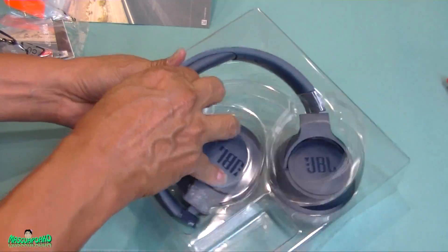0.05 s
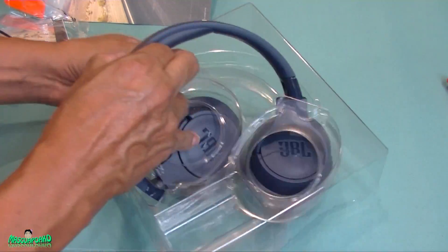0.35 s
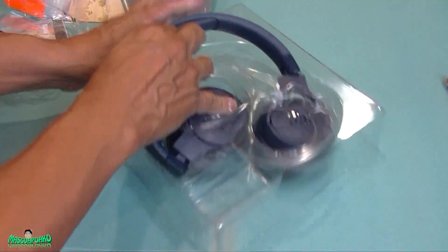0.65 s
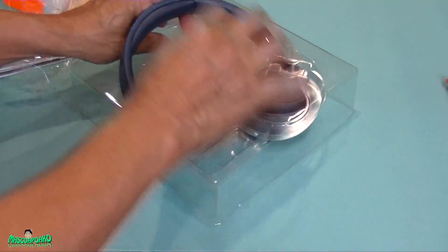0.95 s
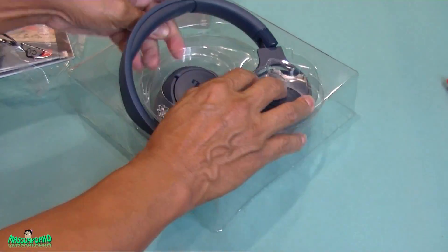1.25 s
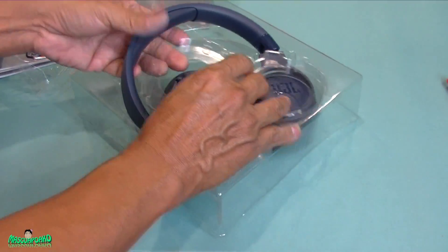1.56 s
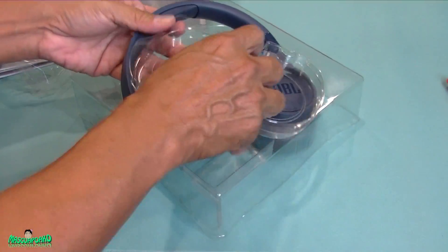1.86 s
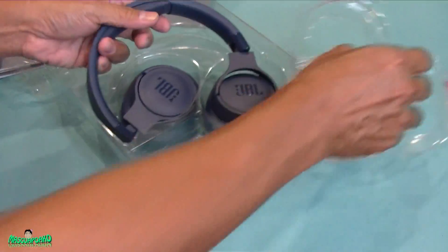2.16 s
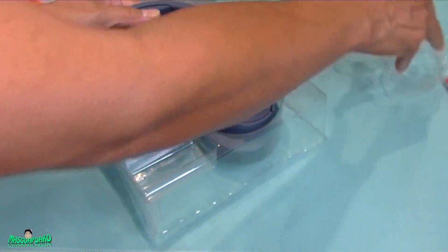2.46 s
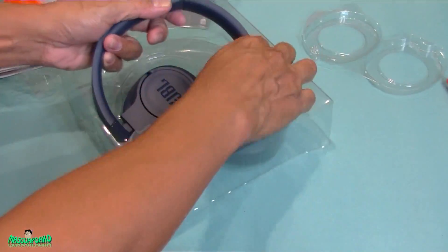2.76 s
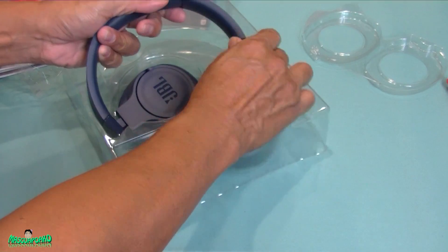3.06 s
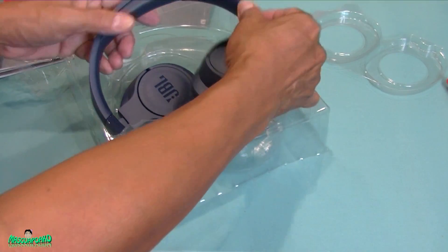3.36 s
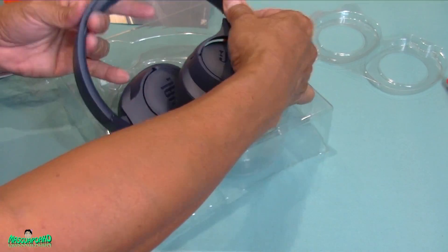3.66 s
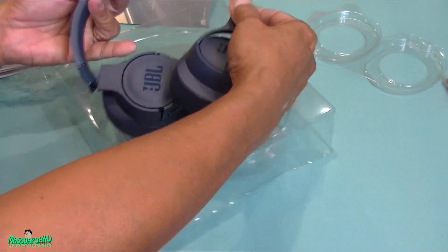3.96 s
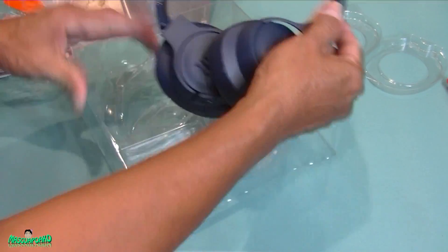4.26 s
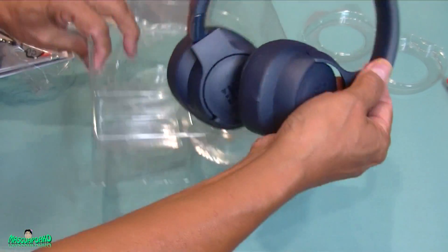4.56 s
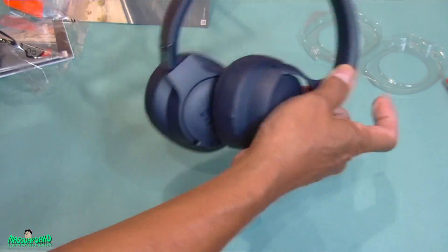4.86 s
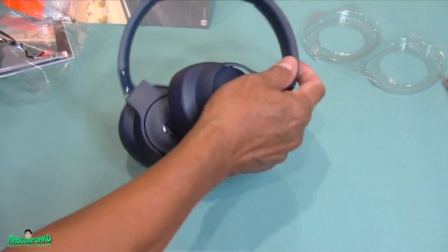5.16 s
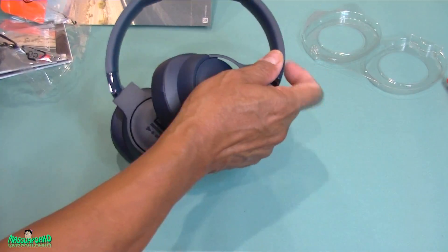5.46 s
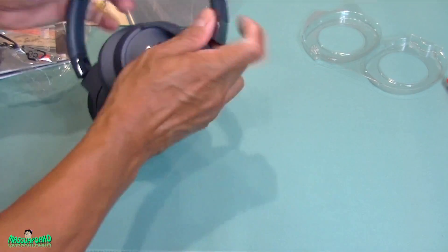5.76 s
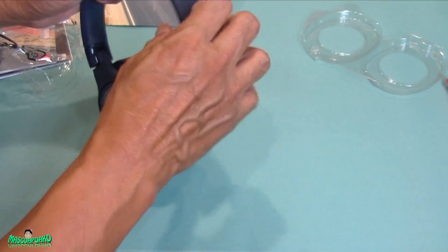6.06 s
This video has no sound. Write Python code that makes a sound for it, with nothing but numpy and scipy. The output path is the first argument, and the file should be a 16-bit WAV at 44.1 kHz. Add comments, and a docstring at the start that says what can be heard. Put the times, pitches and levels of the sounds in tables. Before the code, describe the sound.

A stiff plastic tray crackles, snaps and scrapes as hands pull out headphones, which then click and knock on a table.

```python
"""Hands pull headphones out of a stiff plastic tray on a table, close by in a small room.
First the thin walls buckle loudly and scrape, while the hands' pressure drives stick-slip rubbing and
small snaps. At 1.8 s a round cover pops off. Snaps and scrapes go on, with soft knocks on the table.
From 4.8 s the freed headphones click at their hinges, and at 5.2 s they knock down hardest.
The last clicks and fingertip strokes die away over room air and a faint low hum."""
import sys
import numpy as np
from scipy import signal
from scipy.fft import rfft, irfft
from scipy.io import wavfile

SR = 44100
rng = np.random.default_rng(int(sys.argv[2]) if len(sys.argv) > 2 else 0)


def put_to_file(sound):
    """Save the sound as 16-bit audio at rate SR, in the file named by the first command-line argument."""
    columns = np.atleast_2d(sound).T  # one column per channel
    safe = np.clip(columns, -1, 1)
    whole_steps = np.round(safe * 32767)
    wavfile.write(sys.argv[1], SR, whole_steps.astype(np.int16))


N = 274169
TIME = np.arange(N) / SR

# loudest snaps of the tray: t/s, panel level/dB, panel f/Hz, crack level/dB, crack f/Hz
TRAY_SNAPS = [(.0685, 3, 1700, 6, 8350), (.0804, 5, 1970, 1.5, 8050), (0.0893, 5.5, 910, 6, 7200),
              (0.0952, -3.5, 530, 5.5, 8300), (.116, -5, 480, -0.5, 8300), (.1581, -18, 1110, -2.5, 7360),
              (0.185, -6.5, 580, -2, 8500), (.27, 8, 1450, 1, 5740), (0.322, -9, 1750, -13, 4360),
              (.3631, 3, 2110, -5, 8050), (.367, 2.5, 1320, -3, 7300), (0.3825, 9, 1700, -3, 4740),
              (.458, -9, 2170, -8, 4000), (0.5116, -3.5, 700, -14, 8300), (.572, -7, 1530, -6.5, 7300),
              (0.595, -0.5, 1120, -14, 4050), (.8675, -1.5, 730, -8, 7500), (0.88, 5, 1730, 3, 7250),
              (0.8853, 1, 1580, -2, 6860), (.9537, 0, 1440, -6, 6260), (.981, -7.5, 1920, -8.5, 6900),
              (1.037, -4.5, 1450, -2.5, 7650), (1.1926, -3, 576, -19, 5270), (1.3432, -2.5, 660, -13, 4000),
              (1.353, 0, 2360, 8.5, 7800), (1.513, -8, 846, -15, 3350), (1.6265, -6, 1310, -8.5, 4140),
              (1.6434, -8.5, 1840, -9, 6440), (1.8728, -15, 1880, -4.5, 8360),
              (2.4069, -10, 1260, -14.5, 5200), (2.5638, -7.5, 1770, -5, 4140),
              (2.5782, -10, 1360, -10, 4150), (2.702, -6, 1250, -18, 6300), (2.83, -10, 1570, -4, 5750),
              (2.8684, 3.5, 1640, -1, 4800), (2.9842, -9.5, 1600, -6, 7300), (3.563, -4, 2330, -6.5, 5030),
              (3.605, -2, 1200, -5.5, 5000), (3.7258, -4.5, 940, -4.5, 5130),
              (3.7464, -1.5, 1320, -22, 3990), (3.8044, -1, 860, -16, 4270), (3.9905, -2.5, 660, -22, 8130),
              (4.15, -19.5, 2510, -11.5, 6660), (4.2399, -13, 1280, -22.5, 8100),
              (4.4023, -4, 1230, -12, 6400), (4.4788, -4.5, 784, -8.5, 4800), (4.485, -1, 1440, -5, 4340),
              (4.617, -19, 1580, -15, 9250)]
# main resonances of the tray: f/Hz, bandwidth/Hz, gain/dB
TRAY_MODES = [(484, 66, 10), (634, 124, 8.5), (1070, 55, -2), (1220, 180, 2), (1410, 240, -2.5)]
# the hands' pressure, as the level of steady rubbing: t/s, level/dB
HAND_PRESSURE = [(0, -33), (.25, -43.5), (1.0, -36.5), (1.26, -48.5), (1.42, -43.5), (1.7, -53),
                 (2.16, -40.5), (2.38, -50), (2.76, -43), (3.08, -50.5), (3.46, -51.5), (3.84, -41),
                 (4.12, -56.5), (4.57, -45.5), (4.72, -62), (5.35, -61.5), (5.65, -69), (6.2, -65)]
# scrapes that build up and let go: peak t/s, wall level/dB, surface level/dB, rise/s, fall/s
WALL_SCRAPES = [(0.096, -20, -26.5, 0.026, 0.04), (.18, -49, -37.5, 0.026, 0.05),
                (.598, -27.5, -32.5, 0.014, 0.013), (.634, -22, -30, .01, 0.01),
                (.73, -30, -36, 0.021, .02), (.824, -15, -27.5, 0.059, .028),
                (1.127, -20.5, -22.5, 0.0059, 0.0027), (1.211, -30, -43, .006, 0.015),
                (1.3, -37, -47, .004, 0.013), (1.63, -32, -40, 0.013, .016), (1.875, -40, -41, .012, .02),
                (2.02, -33, -43, 0.029, 0.046), (2.214, -35, -41, .035, 0.048),
                (2.33, -31.5, -39, .03, 0.021), (2.445, -37, -40, .003, .012),
                (2.717, -30.5, -47, 0.01, 0.019), (2.849, -23.5, -30, 0.013, 0.012),
                (2.99, -25, -32, 0.0044, 0.011), (3.55, -35.5, -45.5, 0.027, .02),
                (3.598, -29, -43, 0.013, 0.024), (3.748, -33, -46, 0.008, 0.015),
                (3.829, -29.5, -40, 0.021, 0.0059), (3.93, -35, -50, 0.026, 0.022),
                (4.002, -31.5, -43.5, 0.0046, 0.036), (4.29, -42, -53, 0.021, 0.016),
                (4.422, -22.5, -31.5, 0.0078, 0.026), (5.15, -44, -49, 0.034, 0.016),
                (5.24, -36, -44, 0.048, 0.022), (5.885, -55, -47, .004, .01)]
# spectrum of the rubbed walls: f/Hz, level/dB
WALL_SPECTRUM = [(88, -46), (150, -11.5), (296, -5), (391, -5), (428, -15), (485, -6), (913, 2),
                 (1100, 3.5), (1500, -1.5), (1750, -0.5), (2340, -1.5), (3290, -16), (4270, -6),
                 (4990, -20), (6000, -53), (7800, -71), (13200, -120)]
# spectrum of the surface crackle: f/Hz, level/dB
CRACKLE_SPECTRUM = [(1470, -26.5), (2500, -2.5), (3230, -2), (4080, 0), (4730, -3.5), (8200, -2.5),
                    (14200, -8.5), (14900, -5), (16000, -36)]
# resonances of the whole shell under a hard drag: f/Hz, bandwidth/Hz, gain/dB
SHELL_MODES = [(502, 69, 6.5), (1150, 290, -0.5), (1420, 200, -8)]
# modes of the round cover over an ear cup: f/Hz, level/dB, T60/s
COVER_MODES = [(1350, 0.5, 0.012), (2180, -12.5, 0.0029), (3550, -16, 0.0059), (4300, -8, 0.0064),
               (8270, -18, .004)]
# soft blows of the headphones on table and tray: t/s, level/dB, cut-off f/Hz, chatter duration/s
BLOWS = [(0.0897, -1, 900, .003), (.53, -10.5, 450, .003), (.645, -8.5, 500, .003), (2.46, -9.5, 493, .003),
         (2.562, -10, 480, .021), (3.806, -7, 805, .015), (4.401, -8.5, 800, .003),
         (4.449, -2.5, 900, .003), (5.2198, 3, 1850, .033)]
# modes of the table top: f/Hz, level/dB, T60/s
TABLE_MODES = [(264, -17, 0.076), (408, 2, .1), (519, 5.5, 0.059), (587, 20, 0.083), (770, -12, 0.082),
               (813, 8.5, .08), (1119, 22, 0.041), (1310, 2, 0.055), (1700, 0, 0.06)]
# clicks of the headphones' hinges and casing: t/s, body level/dB, body f/Hz, crack level/dB
HINGE_CLICKS = [(4.777, -20, 890, -35), (4.892, -22, 840, -40), (4.956, -21, 960, -35),
                (5.121, -11.5, 1560, -10), (5.19, -8, 1740, -15), (5.2173, -5.5, 1520, -16.5),
                (5.271, -28, 1500, -21), (5.41, -24, 1500, -35), (5.707, -25, 1380, -42),
                (5.7792, -13.5, 1550, 7), (5.8164, -9, 1500, -11.5), (6.07, -24.5, 1560, -15.5)]
# squeaks of plastic on plastic: t/s, first f/Hz, last f/Hz, level/dB, duration/s, overtone gain/dB
PLASTIC_SQUEAKS = [(0.354, 2300, 2350, -30, 0.015, -16), (1.867, 2030, 1940, -40, 0.017, -20),
                   (3.694, 4280, 4400, -40.5, 0.02, 8), (3.704, 4800, 5000, -43.5, 0.022, 2),
                   (5.152, 2010, 2060, -48, 0.048, -22)]
# fingertips brushing smooth plastic: middle t/s, level/dB, half duration/s
FINGER_STROKES = [(1.932, -44, .012), (2.75, -49, 0.019), (3.187, -51.5, 0.028), (3.363, -52, 0.054),
                  (5.445, -63, 0.15), (5.966, -60, 0.053), (6.138, -54.5, 0.029)]
# reverberation of the room: f/Hz, T60/s, level/dB
ROOM_DECAY = [(202, 0.39, 0.5), (554, 0.29, -4), (1400, 0.3, -6.5), (3600, 0.31, -5), (9200, 0.25, -7.5),
              (15000, 0.27, -7.5)]
# spectrum of the room air: f/Hz, level/dB
AIR_SPECTRUM = [(12, -34), (20, -14), (63, -4), (182, -17), (347, -14), (542, -21), (624, -18),
                (678, -20.5), (1960, -29.5), (2390, -33), (10500, -38.5), (13500, -39), (16000, -35)]
# frequency response of the microphone: f/Hz, gain/dB
MIC_RESPONSE = [(100, 2), (900, 0.5), (1300, -3), (3000, 3.5), (5000, -0.5), (8500, 2.5), (10500, 0.5),
                (13000, 1.5), (15500, -6)]


def tray_snaps(tray_db=-10, ring_at_0db_s=.023, halving_db=18.5, slackest_s=.035):
    """Damped resonance: a harder snap comes from a tauter panel and dies sooner; the tray rings along."""
    events = []
    for s, panel_db, panel_hz, crack_db, crack_hz in TRAY_SNAPS + small_snaps():
        ring_s = min(ring_at_0db_s * 2 ** (-max(panel_db, crack_db) / halving_db), slackest_s)
        events.append((s, panel_db, panel_hz, crack_db, crack_hz, ring_s))
    direct = buckling(events)
    return direct + undb(tray_db) * resonate(direct, TRAY_MODES)


def small_snaps(per_s=13, above_pressure_db=26, spread_db=2.5, spread_octaves=.42):
    """Elastic instability: the sheet gives way at random times, louder the harder it is pressed."""
    count = int(per_s * N / SR)
    times = rng.uniform(0, TIME[-1], 256)[:count]
    scatter = np.clip(rng.standard_normal((256, 4))[:count].T, -2, 2)
    panel_db, crack_db = pressure_db(times) + above_pressure_db + spread_db * scatter[:2]
    panel_hz, crack_hz = [[1070], [5800]] * 2 ** (spread_octaves * scatter[2:])
    return list(zip(times, panel_db, panel_hz, crack_db - 3.5, crack_hz))


def buckling(events, rise_s=.0003, flutter_db=-1, tail_db=-14, zing_db=-7):
    """Snap-through buckling: a panel flips and rings, waves flutter through it, and the crease cracks."""
    out, t = np.zeros((2, N)), np.arange(4096) / SR
    onset = 1 - np.exp(-t / rise_s)  # the buckle takes a moment to cross the panel
    for s, panel_db, panel_hz, crack_db, crack_hz, ring_s in events:
        slack = ring_s / .011  # a taut panel pops with a clear pitch, a slack one rattles
        flip = unit_energy(np.sin(2 * np.pi * panel_hz * t) * onset * decay(t, .28 * ring_s))
        waves = stereo_noise(len(t), .1) * onset * decay(t, 1.36 * ring_s)
        flutter = unit_energy(band(waves, panel_hz, .69 * panel_hz))
        panel = flip + undb(flutter_db) * slack * flutter
        panel = unit_energy(cut(cut(panel, 380, "high"), 2500, "low"))
        crack_envelope = onset * (decay(t, .22 * ring_s) + undb(tail_db) * slack * decay(t, ring_s))
        crack = cut(stereo_noise(len(t), .42) * crack_envelope, 1630, "high")
        crack = unit_energy(band(crack, crack_hz, .97 * crack_hz))
        zing = unit_energy(np.sin(2 * np.pi * crack_hz * t) * onset * decay(t, .0018))
        crease = unit_energy(crack + undb(zing_db) * zing / slack)
        add(out, s - rise_s, undb(panel_db) * panel + undb(crack_db) * crease)
    return out


def rubbing(surface_db=-8, firm_db=-42, hard_drag_db=-19, unsteady_db=2):
    """Stick-slip friction drives the walls into a hollow rasp, while the surface fizzes and ticks."""
    wall = undb(pressure_db(TIME) + unsteady_db * drift(14))
    surface = undb(surface_db) * wall
    catching = np.minimum(surface / undb(firm_db), 1)  # a light touch glides, a firm one catches
    sparse_slips = slips(per_s=80, spread_db=2.6, side=.4, t60=.005)
    ticks = undb(-.5) * surface * catching * unit_rms(colour(sparse_slips, CRACKLE_SPECTRUM))
    for peak_s, hollow_db, bright_db, rise_s, fall_s in WALL_SCRAPES:
        swell = np.exp(-np.abs(TIME - peak_s) / np.where(TIME < peak_s, rise_s, fall_s))
        wall = np.hypot(wall, undb(hollow_db) * swell)
        surface = np.hypot(surface, undb(bright_db) * swell)
    force = colour(slips(per_s=1400, spread_db=1.96, side=.16, t60=.014), WALL_SPECTRUM)
    rasp = unit_rms(force + undb(2) * resonate(force, TRAY_MODES))
    shell = unit_rms(resonate(force, SHELL_MODES))
    drag = np.minimum(wall / undb(hard_drag_db), 1)  # in a hard drag the shell's resonances take over
    fizz = unit_rms(colour(slips(per_s=980, spread_db=2.8, side=.31, t60=.034), CRACKLE_SPECTRUM))
    return wall * ((1 - drag) * rasp + drag * shell) + surface * fizz + ticks


def slips(per_s, spread_db, side, t60):
    """Shot noise: tiny stick-slip releases of very uneven size, each smeared briefly by the sheet."""
    sizes = undb(spread_db * np.minimum(rng.exponential(size=N), 4.5))
    releases = sizes * (rng.random(N) < per_s / SR)
    energy = signal.lfilter([1], [1, -decay(2 / SR, t60)], releases ** 2)
    return unit_rms(stereo_noise(N, side) * np.sqrt(energy))


def pressure_db(times):
    """Friction grows with load: the hands' pressure as a rubbing level at the given times."""
    return np.interp(times, *np.transpose(HAND_PRESSURE))


def cover_pop(at_s=1.7682, level_db=9.2, rise_s=.00064, rim_db=-4):
    """Snap-through of a dome: the taut cover flips once with a hollow pop, and its rim crackles."""
    out, t = np.zeros((2, N)), np.arange(2048) / SR
    onset = 1 - np.exp(-t / rise_s)
    dome = 0
    for hz, db, t60 in COVER_MODES:
        mode = np.sin(2 * np.pi * (hz * t + rng.random()))
        dome += undb(db) * unit_energy(mode * onset * decay(t, t60))
    rim = unit_energy(band(stereo_noise(len(t), .85) * onset * decay(t, .01), 2200, 4200))
    add(out, at_s, undb(level_db) * (dome + undb(rim_db) * rim))
    return out


def knocks(thud_db=2, thud_t60=.034):
    """Impact excitation: padded blows thud and ring the table's modes; softer contact sounds duller."""
    out, t = np.zeros((2, N)), np.arange(SR // 4) / SR
    for s, db, cutoff_hz in contacts():
        weights = 1 + .5 * rng.standard_normal(len(TABLE_MODES))  # each spot favours other modes
        ring = sum(weight * undb(mode_db) * np.sin(2 * np.pi * hz * t) * decay(t, t60)
                   for weight, (hz, mode_db, t60) in zip(weights, TABLE_MODES))
        thud = stereo_noise(len(t), .36) * decay(t, thud_t60)
        thud = cut(cut(thud, 275, "high"), 1380, "low")
        blow = unit_energy(ring) + undb(thud_db) * unit_energy(thud)
        add(out, s, undb(db) * unit_energy(cut(blow, cutoff_hz, "low")))
    return out


def contacts(gap_s=.006, db_per_s=-130, octaves_per_s=-34):
    """Inelastic rebound: a longer blow is a run of contacts, weaker and duller as it settles."""
    return [(s + late, db + db_per_s * late, hz * 2 ** (octaves_per_s * late))
            for s, db, hz, chatter_s in BLOWS for late in np.arange(0, chatter_s, gap_s)]


def hinge_clicks(crack_hz=5400, ring_s=.013):
    """Damped transients: the headphones' stiff parts click like short, dry snaps."""
    return buckling([(s, db, hz, crack_db, crack_hz, ring_s) for s, db, hz, crack_db in HINGE_CLICKS])


def squeaks(waver=.069, third_db=-7):
    """Self-excited oscillation: slips briefly lock into an unsteady, gliding tone with overtones."""
    out = np.zeros((2, N))
    for s, first_hz, last_hz, db, length_s, overtone_db in PLASTIC_SQUEAKS:
        size = int(length_s * SR)
        hz = np.linspace(first_hz, last_hz, size) * (1 + waver * drift(1040)[:size])
        phase = 2 * np.pi * np.cumsum(hz) / SR
        overtones = np.sin(2 * phase) + undb(third_db) * np.sin(3 * phase)
        tone = np.sin(phase) + undb(overtone_db) * overtones
        add(out, s, undb(db) * unit_rms(tone * np.hanning(size))[None])
    return out


def finger_swishes(centre_hz=10500, width_hz=5500):
    """Sliding friction: skin glides without catching, giving one smooth, high hiss per stroke."""
    strokes = sum(undb(db) * np.exp(-((TIME - s) / half_s) ** 2) for s, db, half_s in FINGER_STROKES)
    return strokes * unit_rms(band(stereo_noise(N, .21), centre_hz, width_hz))


def room(direct, patterns=18):
    """Reverberation by convolution: the echo pattern keeps changing as the hands move the plastic."""
    out, hop = direct.copy(), N // patterns + 1
    for start in range(0, N, hop):
        add(out, start / SR, signal.fftconvolve(direct[:, start:start + hop], reflections(), axes=1))
    return out


def reflections(first_s=.0025, widening_hz=5000):
    """Diffuse field: noise decays in octave bands, longer in the bass and wider in the treble."""
    t = np.arange(16384) / SR
    hz = np.arange(len(t) // 2 + 1) * SR / len(t)
    centres = 125 * 2. ** np.arange(8)
    onset = np.clip(t / first_s - 1, 0, 1)
    tail = 0
    for centre, weights in zip(centres, np.eye(len(centres))):
        octave = np.sqrt(np.interp(hz, centres, weights))
        noise = stereo_noise(len(t), side=min(.19 + centre / widening_hz, 1))
        noise = irfft(rfft(noise) * octave)
        envelope = unit_energy(decay(t, lookup(centre, ROOM_DECAY)) * onset)
        tail += undb(lookup(centre, ROOM_DECAY, column=2)) * noise * envelope
    return tail


def background(air_db=-49.5, hum_hz=55.3, hum_db=-54, drone_hz=240.3, drone_db=-63):
    """Noise floor: broadband room air, with narrow noise bands as a wavering hum and a faint drone."""
    air = colour(stereo_noise(N, 1), AIR_SPECTRUM)
    air /= np.sqrt(np.mean(cut(air, 100, "high") ** 2))  # unit rms above 100 Hz
    hum = unit_rms(band(band(stereo_noise(N, .64), hum_hz, 14), hum_hz, 14))
    drone = unit_rms(band(band(stereo_noise(N, .4), drone_hz, 40), drone_hz, 40))
    floor = undb(air_db + .52 * drift(2.76)) * air + undb(hum_db) * hum + undb(drone_db) * drone
    return floor * undb([[-1.3], [1.3]])  # louder on the right


def resonate(x, modes):
    """Modal superposition: a body responds as the sum of its resonances."""
    return sum(undb(db) * band(x, hz, width_hz) for hz, width_hz, db in modes)


def band(x, hz, width_hz):
    """Second-order resonance with gain 1 at its centre."""
    w = 2 * np.pi * min(hz, SR / 2 - 1000) / SR
    damping = np.sin(w) * width_hz / hz / 2
    return signal.lfilter([damping, 0, -damping], [1 + damping, -2 * np.cos(w), 1 - damping], x)


def cut(x, hz, kind):
    """Second-order low-pass or high-pass filter."""
    return signal.sosfilt(signal.butter(2, hz, kind, fs=SR, output="sos"), x)


def colour(x, spectrum, size=4096):
    """Minimum-phase filter with the given shape: f/Hz, gain/dB."""
    hz = np.arange(size // 2 + 1) * SR / size
    cepstrum = irfft(np.log(undb(lookup(hz, spectrum))))
    cepstrum[1:size // 2] *= 2  # folding the cepstrum makes the filter causal
    cepstrum[size // 2 + 1:] = 0
    impulse_response = irfft(np.exp(rfft(cepstrum)))
    return signal.fftconvolve(x, impulse_response[None], axes=1)[:, :x.shape[1]]


def lookup(hz, table, column=1):
    """Interpolation on a log-frequency axis."""
    table = np.array(table, float)
    return np.interp(np.log(np.maximum(hz, 1)), np.log(table[:, 0]), table[:, column])


def stereo_noise(size, side):
    """Partial coherence: noise at the two microphone ports, alike at side 0 and unrelated at 1."""
    common, opposed = rng.standard_normal((2, size))
    return np.array([common + side * opposed, common - side * opposed]) / np.hypot(1, side)


def drift(per_s):
    """Continuous random fluctuation with a spread near 1."""
    return np.interp(TIME * per_s, np.arange(2000), rng.standard_normal(2000))


def decay(t, t60):
    """Free exponential decay, by 60 dB in t60 seconds."""
    return np.exp(-np.log(1000) * t / max(t60, 1e-3))


def undb(db):
    """Level to amplitude ratio."""
    return 10 ** (np.asarray(db) / 20)


def unit_rms(x):
    """Normalisation to rms 1."""
    return x / np.sqrt(np.mean(x ** 2))


def unit_energy(x):
    """Normalisation to energy 1 in each channel."""
    return x / np.sqrt(np.sum(x ** 2, axis=-1, keepdims=True))


def add(out, at_s, sound):
    """Superposition of a sound from a given time on."""
    start = max(int(at_s * SR), 0)
    out[:, start:start + sound.shape[1]] += sound[:, :N - start]


def scene(final_lag_s=.00002):
    """Superposition of handling, echoes and background; the sound reaches the left port slightly first."""
    left, right = (tray_snaps() + hinge_clicks() + cover_pop() + rubbing()
                   + finger_swishes() + squeaks() + knocks())
    lag_s = final_lag_s * (TIME / TIME[-1]) ** 2
    direct = np.array([left, np.interp(TIME - lag_s, TIME, right)])
    return room(direct) * undb([[-.1], [.1]]) + background()


def record(dry):
    """Transduction: the microphone colours the sound, clips at full scale and cuts off above 16 kHz."""
    clipped = np.clip(colour(dry, MIC_RESPONSE), -1, 1)
    return signal.sosfilt(signal.ellip(8, .2, 70, 16000, fs=SR, output="sos"), clipped)


dry = scene()
out = record(dry)
put_to_file(out)
```